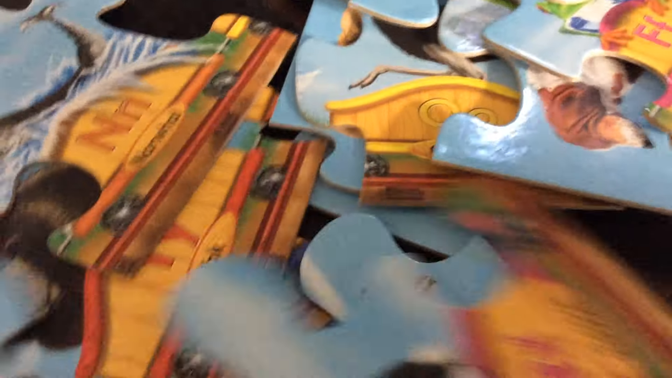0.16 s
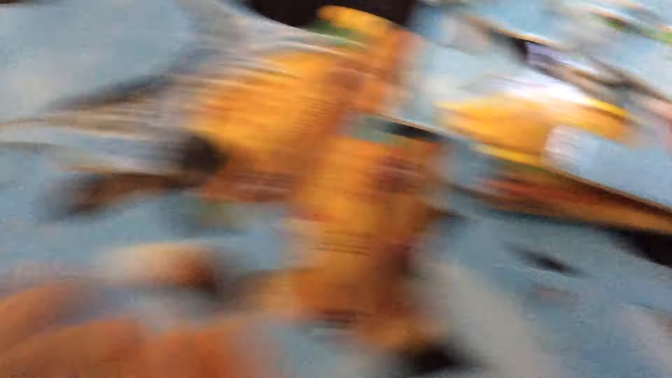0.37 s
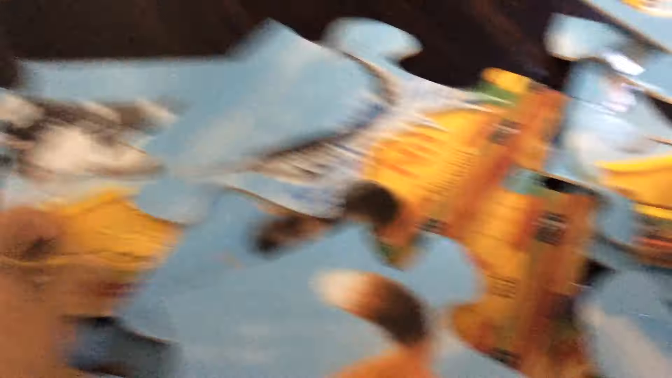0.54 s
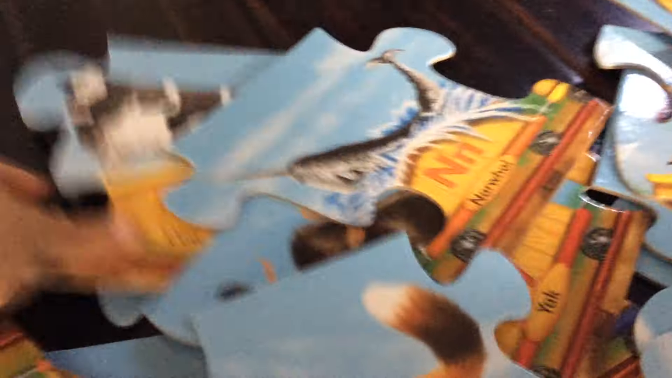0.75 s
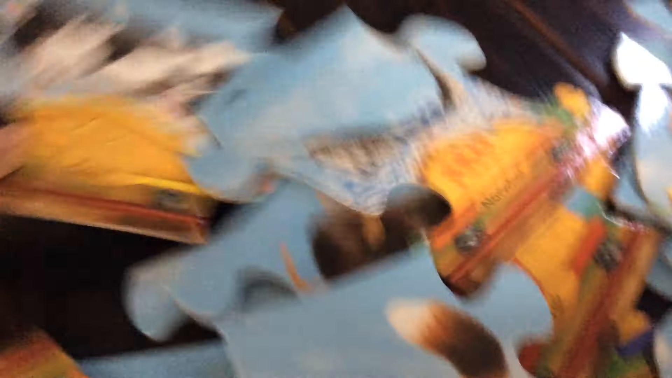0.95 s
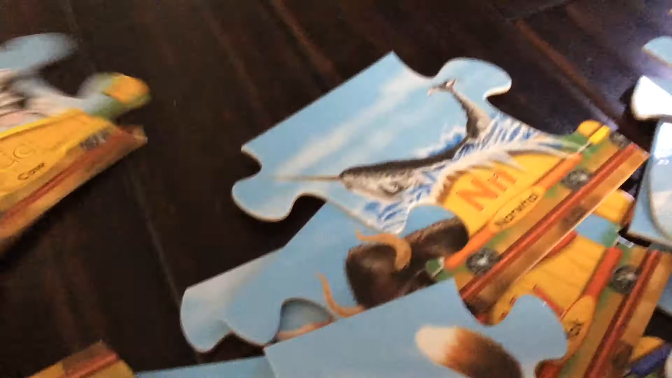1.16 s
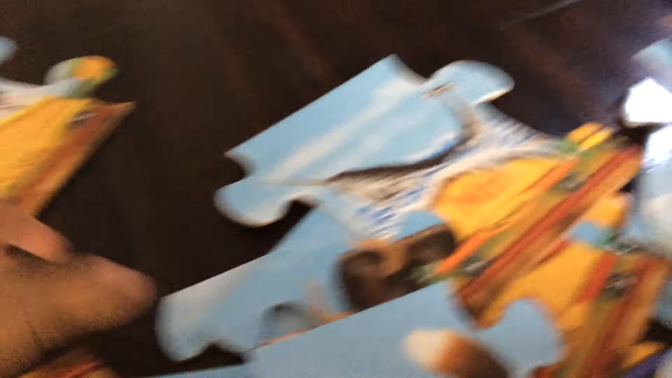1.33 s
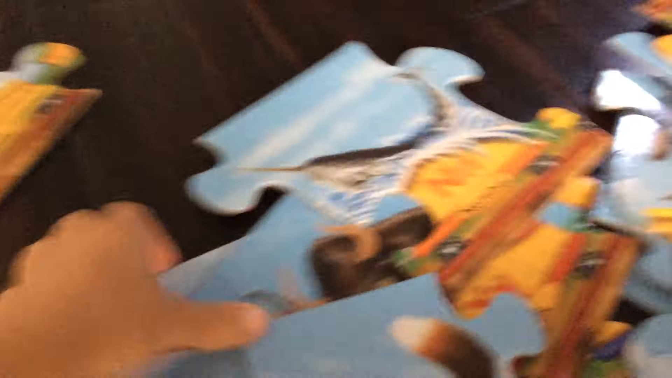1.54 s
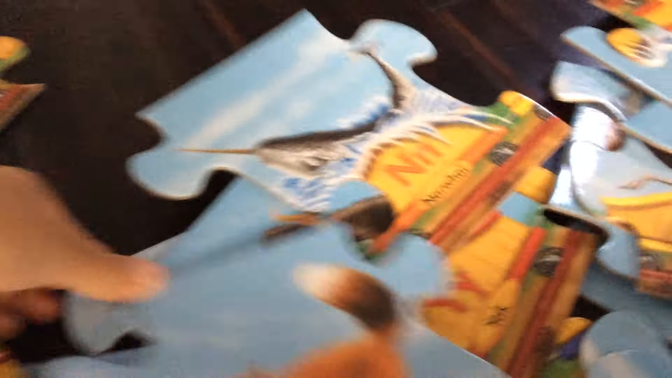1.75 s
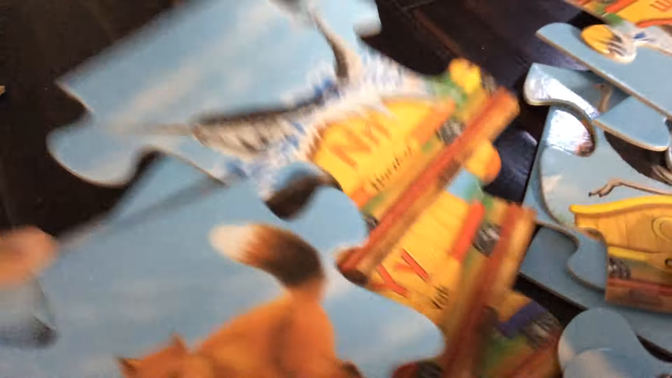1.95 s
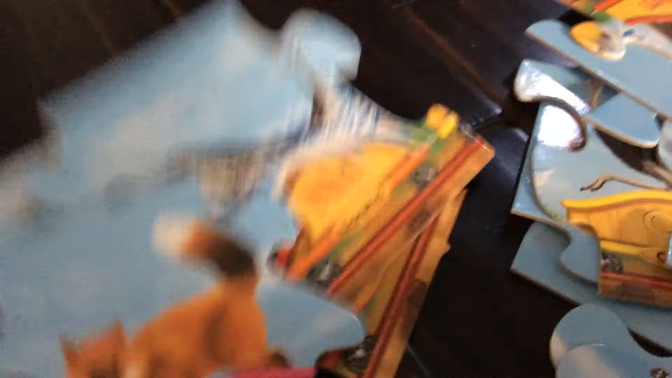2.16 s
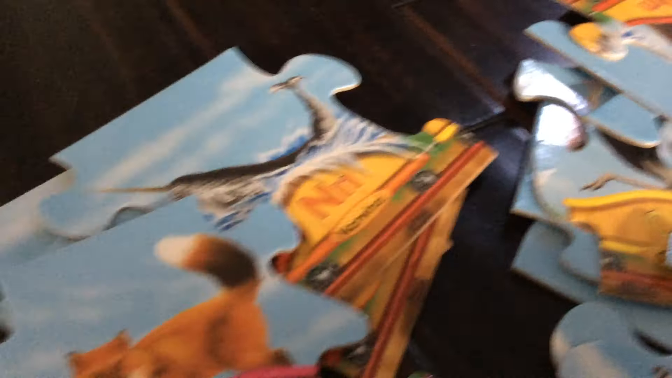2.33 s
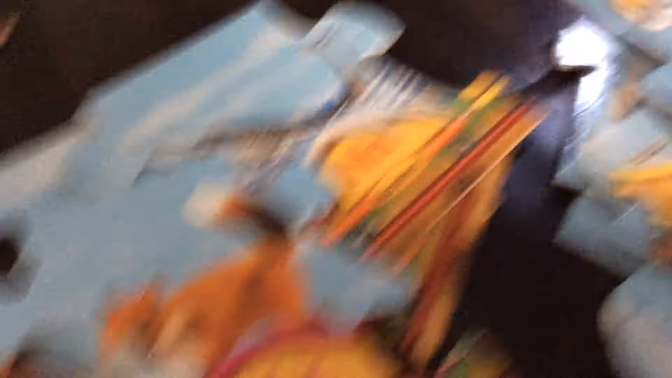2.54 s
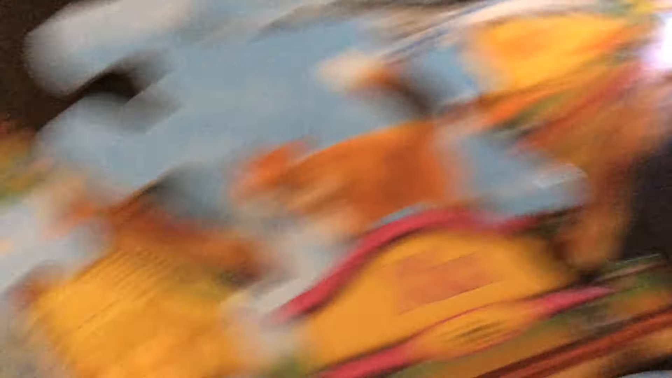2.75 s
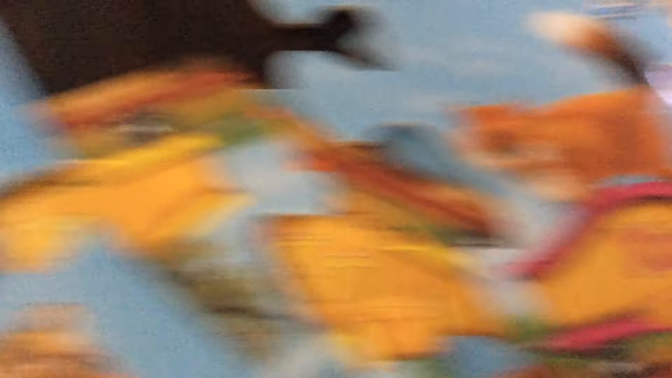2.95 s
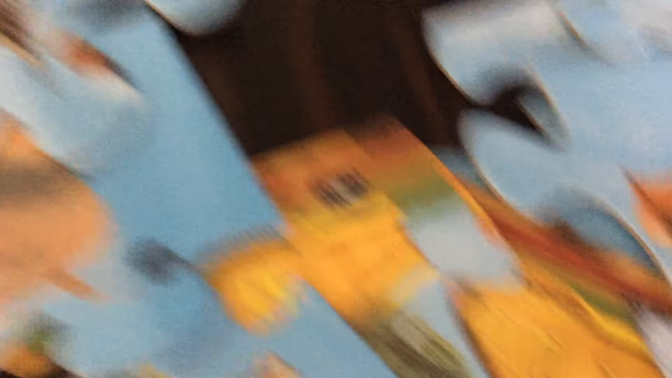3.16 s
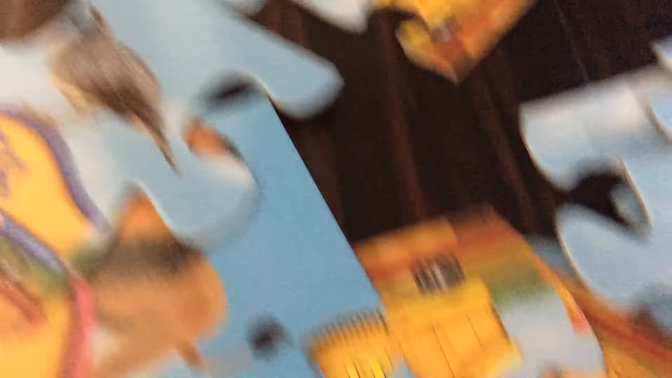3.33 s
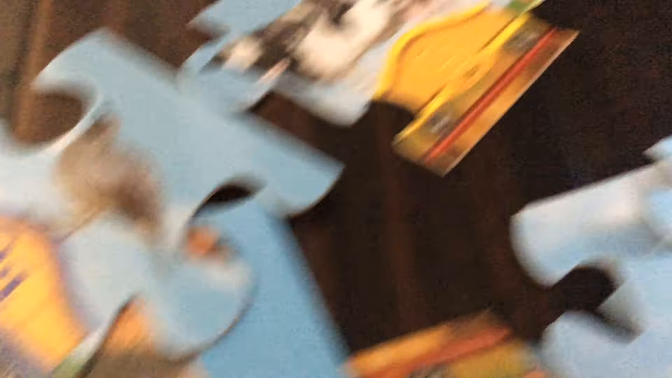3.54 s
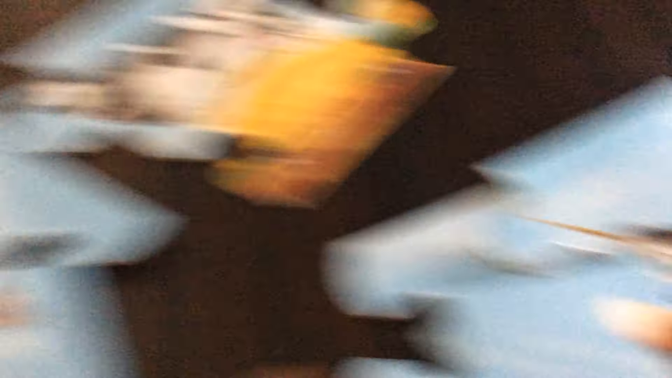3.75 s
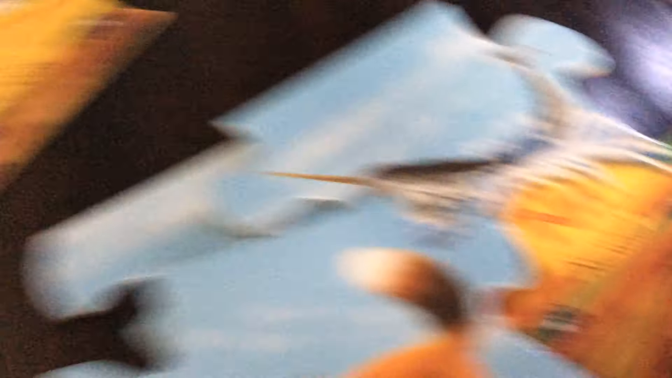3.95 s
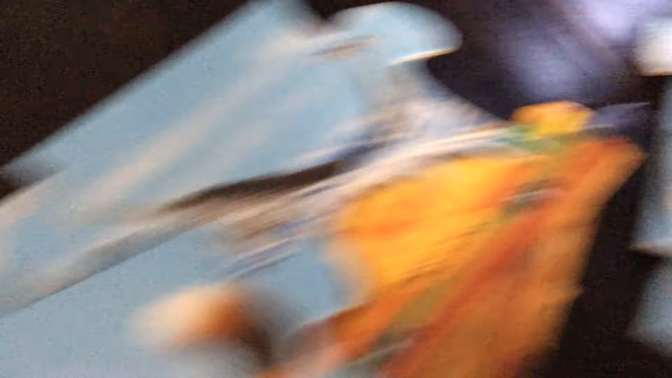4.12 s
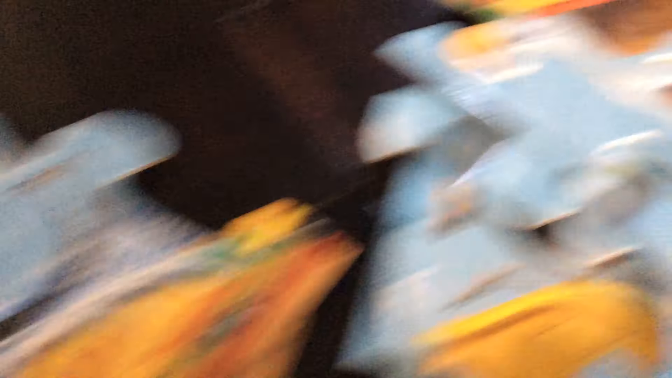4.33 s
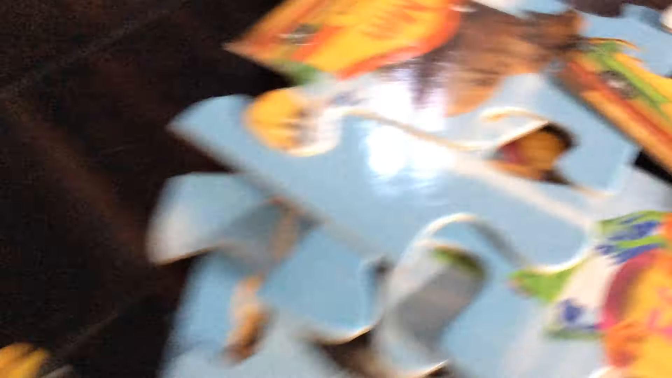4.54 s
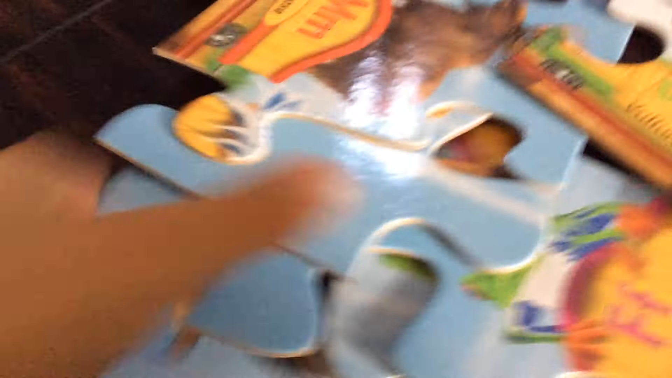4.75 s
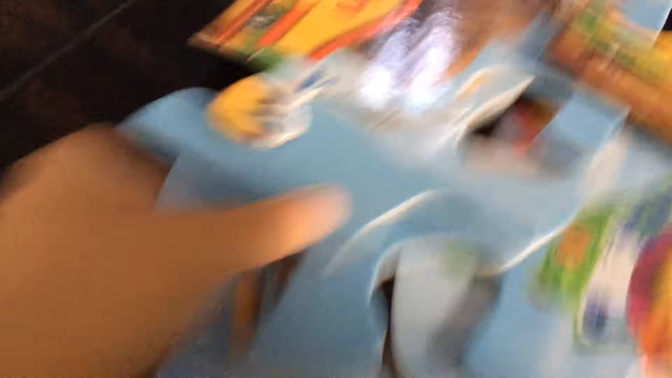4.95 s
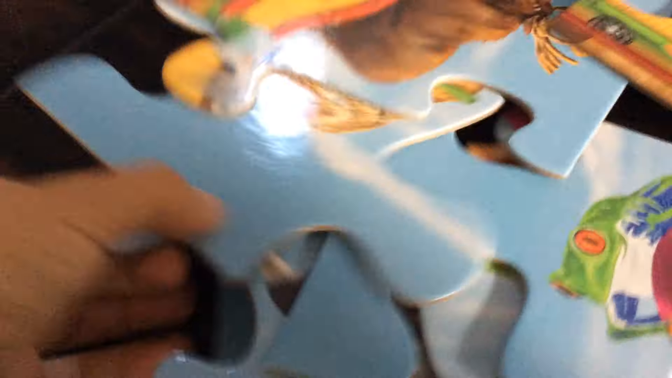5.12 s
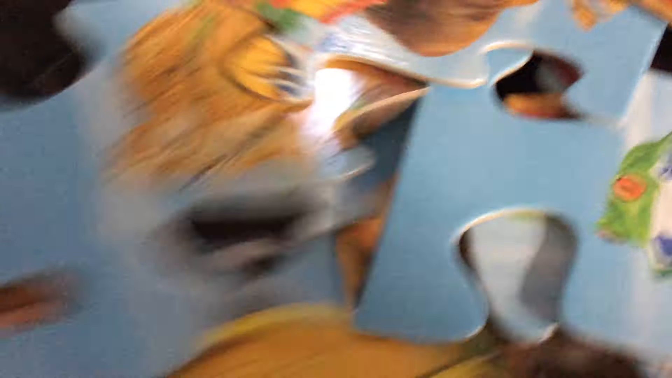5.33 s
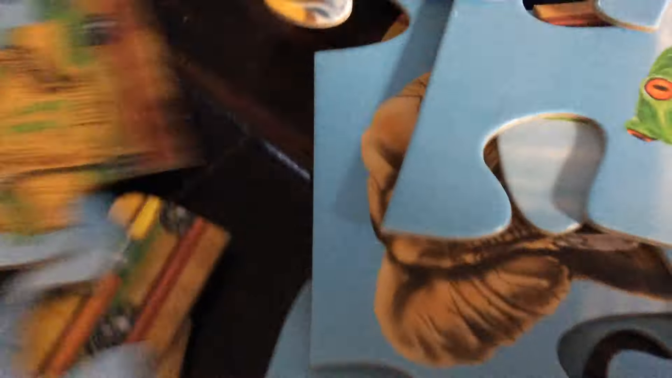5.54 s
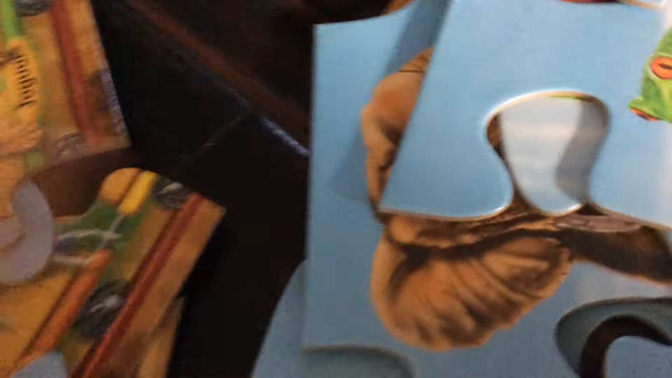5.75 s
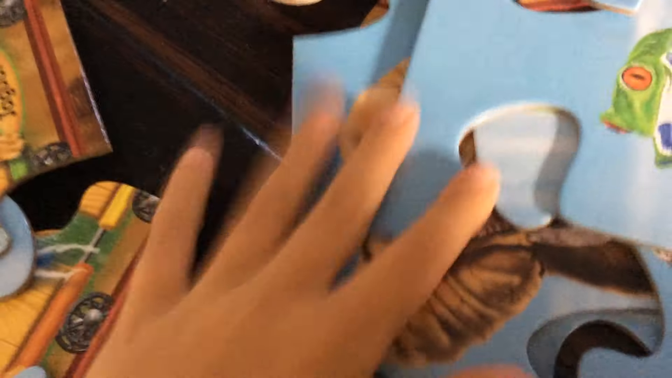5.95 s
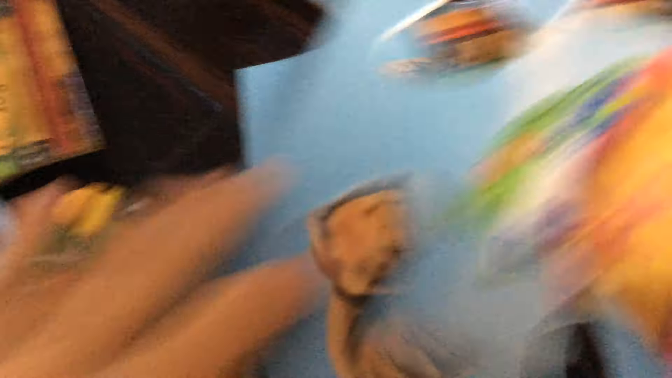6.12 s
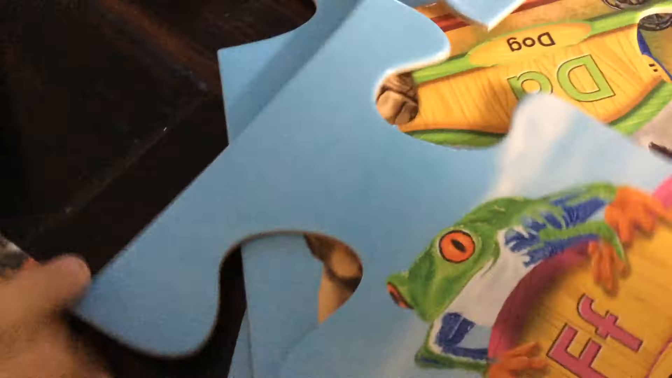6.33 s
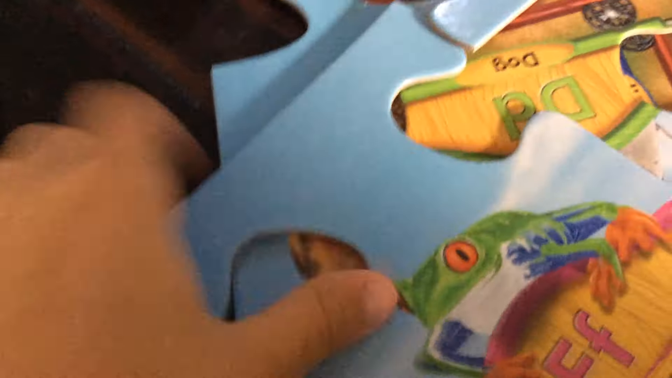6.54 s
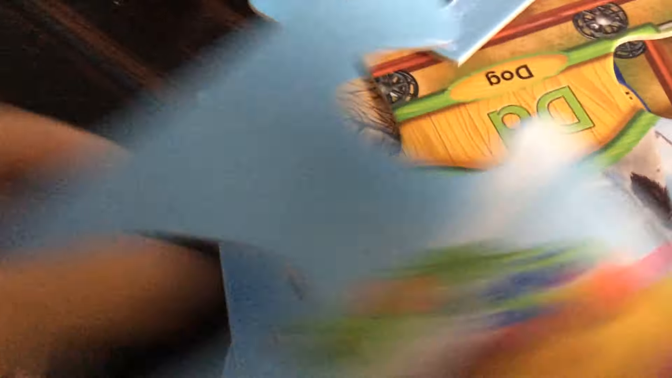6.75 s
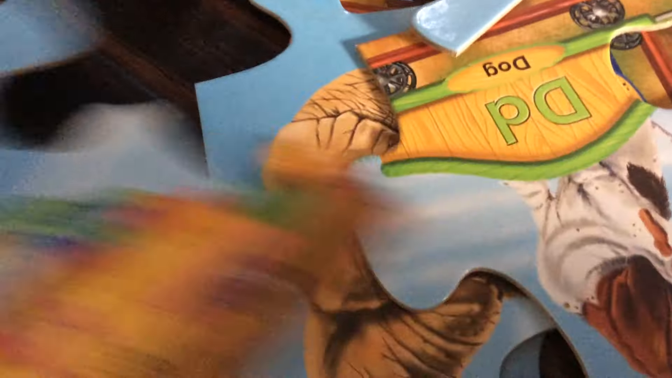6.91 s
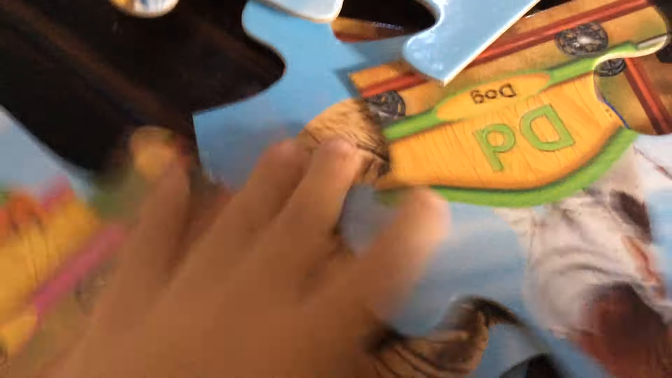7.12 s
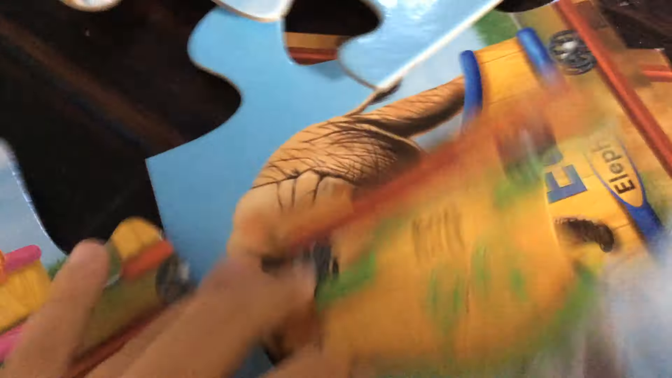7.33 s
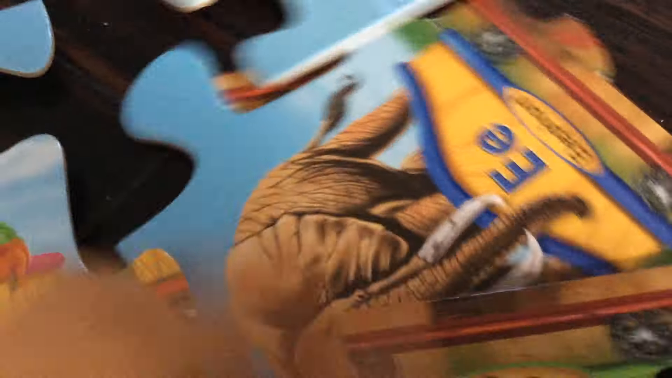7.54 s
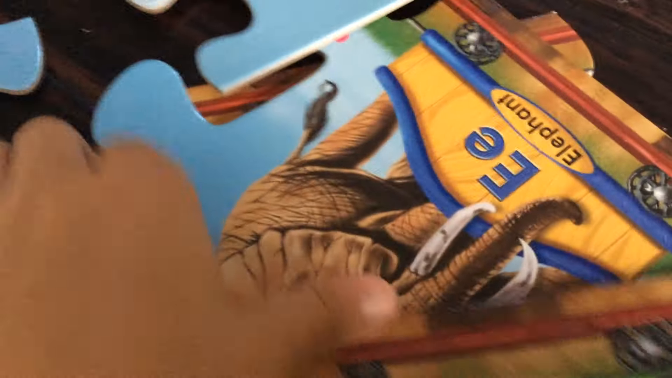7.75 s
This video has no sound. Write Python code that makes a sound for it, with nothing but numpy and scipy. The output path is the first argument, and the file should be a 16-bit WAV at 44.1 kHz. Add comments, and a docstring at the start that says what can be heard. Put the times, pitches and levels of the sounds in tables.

```python
"""Shuffling cardboard puzzle pieces

Thick pieces move on a hard floor in a quiet room, close to the microphone, while an appliance hums.
Edges tap and snap: noisy chatter rings card modes over a treble snap and a low floor thud.
Faces slide in grainy scrapes of shaped, clumpy noise; a lifted piece fans a puff of low noise at the port.
Taps and scrapes, but not the puff or the hum, leave a faint room echo."""
import sys
import numpy as np
from scipy import signal
from scipy.fft import rfft, irfft, next_fast_len
from scipy.io import wavfile
from scipy.ndimage import uniform_filter1d, map_coordinates

SR = 44100
rng = np.random.default_rng(int(sys.argv[2]) if len(sys.argv) > 2 else 0)


def dump_mix(stems):
    """Bounce the given channels to the path in sys.argv[1] as a 16-bit WAV at rate SR."""
    frames = np.atleast_2d(stems).T  # one column per channel
    limited = np.clip(frames, -1, 1)  # hard clip at full scale
    pcm = np.round(limited * 32767).astype(np.int16)
    wavfile.write(sys.argv[1], SR, pcm)


N = 347463  # samples, about 7.9 s


def amp(db):
    """Decibels to gain."""
    return 10 ** (np.asarray(db) / 20)


def unit(x):
    """Scale to rms 1."""
    return x / np.sqrt(np.mean(x ** 2) + 1e-20)


def along(points, hz):
    """Read a curve of (Hz, value) points on a log frequency axis."""
    f, v = np.transpose(points)
    return np.interp(np.log(hz + 1), np.log(f + 1), v)


def wobble(rate):
    """A smooth random curve with rate knots a second."""
    knots = rng.standard_normal(int(N * rate / SR) + 4)
    return map_coordinates(knots, [np.arange(N) * rate / SR])


def filtered(x, response):
    """Shape x by a response given as a function of frequency."""
    m = next_fast_len(N + SR // 2)
    return irfft(rfft(x, m) * response(np.fft.rfftfreq(m, 1 / SR)), m)[..., :N]


def coloured(x, spectrum):
    """Shape x by a spectrum, 60 dB further down outside its end points, and scale to rms 1."""
    lowest, highest = spectrum[0][0], spectrum[-1][0]

    def response(hz):
        outside = (hz > highest) | (hz < lowest)
        return amp(along(spectrum, hz) - 60 * outside)

    return unit(filtered(x, response))


def peak(rows):
    """Scale each row so that its loudest 1.5 ms has the power of a sine of amplitude 1."""
    power = uniform_filter1d(rows ** 2, 66, axis=1).max(axis=1, keepdims=True)
    return rows / np.sqrt(2 * power)


def swell(start, rise, hold, fade):
    """Gain that rises, holds and then loses 20 dB every fade seconds; signs of hold and fade are ignored."""
    t = np.arange(N) / SR - start
    fading = np.maximum(t - rise - abs(hold), 0)
    return np.clip(t / rise, 0, 1) ** 2 * amp(-20 * fading / abs(fade))


# Appliance tones: pitch_hz, level_db (rms, before a slow wobble)
HUM_TONES = [(123.8, -76), (193.8, -78.5), (296.1, -73.5), (629.8, -89)]
# Wavering level of the deepest hum: time_s, level_db (rms)
DEEP_HUM_LEVEL = [(0, -65.5), (1.2, -64), (1.5, -70.5), (2.8, -66.5), (3.5, -69.5), (5.5, -67), (6.5, -73),
                  (7.1, -73.5), (7.88, -66)]
# Spectrum of room noise and microphone hiss: freq_hz, level_db (per Hz, relative)
ROOM_NOISE_SPECTRUM = [(25, -30), (45, -12), (70, -10.5), (95, -10), (125, -7), (200, -10.5), (320, -12.5),
                       (677, -24), (1610, -20), (3520, -30), (9320, -29), (16000, -55.5)]
DEEP_HUM_HZ = 59.4
ROOM_NOISE_DB = -69.5


def background():
    """Steady room noise under appliance tones whose level and phase drift a little."""
    t = np.arange(N) / SR
    hum = np.zeros(N)
    for hz, db in HUM_TONES:
        level = np.sqrt(2) * amp(db + .8 * wobble(0.68))
        hum += level * np.sin(2 * np.pi * hz * t + hz / 400 * wobble(2.2))
    time_s, level_db = np.transpose(DEEP_HUM_LEVEL)
    deep_level = np.sqrt(2) * amp(np.interp(t, time_s, level_db))
    hum += deep_level * np.sin(2 * np.pi * DEEP_HUM_HZ * t + .3 * wobble(3))
    noise = coloured(rng.standard_normal(N), ROOM_NOISE_SPECTRUM)
    return hum + amp(ROOM_NOISE_DB + 0.27 * wobble(5.6)) * noise


# One piece drawn over another: start_s, hold_s (sign ignored; part goes into the rise),
# fade_s (per 20 dB, sign ignored), scrape_db, hiss_db (glossy face), drag_db (floor rumble)
SLIDE_STROKES = [(0.014, .035, .07, -54, -64, -58.5), (0.072, .02, 0.1, -56, -61.5, -62.5),
                 (0.1, .05, 0.16, -60, -59, -82), (0.154, .07, 0.24, -54.5, -59, -77.5),
                 (0.3, .03, 0.2, -64.5, -69, -67), (0.369, .03, 0.17, -63, -67, -72),
                 (0.405, .035, 0.05, -50, -65, -56), (0.476, .02, 0.12, -58, -85, -57),
                 (0.62, .02, 0.35, -58.5, -75, -64), (0.789, .02, 0.04, -61, -66, -63.5),
                 (0.871, .08, 0.3, -70, -80, -78), (0.959, .07, 0.36, -64, -71.5, -73),
                 (1.048, .01, -0.0457, -43, -52, -49.5), (1.1, .05, 0.32, -66, -62, -60),
                 (1.18, .01, -0.08, -50, -74, -55), (1.265, .01, 0.06, -55.5, -69, -57),
                 (1.496, .005, 0.3, -61, -73, -60.5), (1.58, .01, 0.29, -59, -69, -76),
                 (1.652, .1, 0.75, -65, -72, -71), (2.043, .08, 0.25, -58.5, -65, -62),
                 (2.15, .03, 0.02, -59, -64, -65), (2.21, .05, 0.12, -60, -69.5, -63.5),
                 (2.269, .03, 0.04, -44, -50, -42.5), (2.337, .01, 0.21, -57, -67, -64),
                 (3.471, .72, .2, -84, -79, -98), (3.766, .08, 0.57, -76.5, -94, -96),
                 (4.26, .04, 0.49, -84, -73.5, -88), (4.401, 0.38, 0.05, -77, -79.5, -78),
                 (4.76, .1, 0.24, -68, -66, -71.5), (4.94, .01, 0.21, -56.5, -63.5, -75),
                 (4.999, .35, 0.44, -68, -64.5, -78), (5.125, .03, 0.22, -53.5, -87.5, -65),
                 (5.375, .04, .03, -57.5, -71, -70.5), (5.431, .015, 0.0136, -46, -70, -56.5),
                 (5.476, .17, 0.06, -61, -64, -78), (5.699, .01, 0.25, -58, -66, -66),
                 (5.8, .2, 0.6, -69.5, -70.5, -77), (6.051, .13, .1, -67.5, -62.5, -69),
                 (6.195, .02, 0.2, -58, -61.5, -56), (6.268, .06, 0.3, -66, -63.5, -86),
                 (6.39, .09, -0.06, -73, -67, -79), (6.48, .11, 0.3, -70, -69, -75),
                 (6.637, .09, 0.03, -61, -62.5, -61), (6.771, .06, -0.2, -67, -69, -65),
                 (6.848, .02, -0.37, -61, -60.5, -62.5), (6.918, 0.043, -0.8, -70, -66, -70),
                 (6.977, .01, 0.16, -58, -65, -60), (7.025, .06, -0.28, -65, -79, -82),
                 (7.218, .03, 0.17, -60, -69, -64.5), (7.27, .12, 0.15, -64, -66.5, -83),
                 (7.379, .22, 0.13, -63.5, -64.5, -73), (7.739, .05, 0.14, -60, -71, -62.5),
                 (7.814, .03, -0.36, -60, -67.5, -61)]
GRIP_S, RISE_SHARE_OF_HOLD = 0.018, .2  # a stroke rises for the grip time plus this share of its hold


def strokes():
    """Gains of scrape, hiss and drag; overlapping strokes add as powers."""
    power = 0
    for start, hold, fade, *levels_db in SLIDE_STROKES:
        rise = GRIP_S + RISE_SHARE_OF_HOLD * abs(hold)
        shape = swell(start, rise, (1 - RISE_SHARE_OF_HOLD) * hold, fade)
        power = power + (amp(levels_db)[:, None] * shape) ** 2
    return np.sqrt(power)


def streaky(x, depth_db):
    """Narrow bands swell and fade on their own, as the free, ringing part of a sliding card changes."""
    bands = signal.stft(x, nperseg=256)[2]
    field = uniform_filter1d(rng.standard_normal(bands.shape), size=2, axis=0)
    field = uniform_filter1d(field, size=14, axis=1)
    return signal.istft(bands * amp(depth_db * unit(field)), nperseg=256)[1][:N]


# Spectrum of the card's scrape: freq_hz, level_db (per Hz, relative)
SCRAPE_SPECTRUM = [(290, -46.5), (500, 2.5), (543, -18.5), (750, 1), (1020, -1.5), (1390, 5), (2120, 3),
                   (2840, -4.5), (3080, -7.5), (3880, -4), (4390, -10), (6000, -18.5), (7800, -41),
                   (13200, -120)]
# Spectrum of the glossy face's hiss: freq_hz, level_db (per Hz, relative)
GLOSS_SPECTRUM = [(2060, -13.5), (3500, -5.5), (4240, -10.5), (5220, -6), (12200, -12), (14700, -19.5),
                  (16000, -29.5)]
# Spectrum of the floor's drag rumble: freq_hz, level_db (per Hz, relative)
DRAG_SPECTRUM = [(90, -24.5), (150, -4), (250, -7), (400, -5.5), (700, -10.5)]


def sliding():
    """Fibres catch and let go in clumps; the same catches excite card, glossy face and floor."""
    scrape, hiss, drag = strokes()
    clumps = wobble(45)
    catches = unit((rng.random(N) < .03) * rng.standard_normal(N))

    def rub(grain, depth_db):
        rubbing = rng.standard_normal(N) + grain * catches
        return rubbing * amp(depth_db * clumps + 1.5 * wobble(120))

    card = scrape * coloured(streaky(rub(.7, 1.3), depth_db=3.2), SCRAPE_SPECTRUM)
    face = hiss * coloured(streaky(rub(.35, 1.2), depth_db=1.5), GLOSS_SPECTRUM)
    floor = drag * coloured(rub(.9, 3), DRAG_SPECTRUM)
    return card + face + floor


TICK_OVER_SCRAPE_DB, TICK_HZ, TICK_T60_MS = 6.5, 1900, 14  # typical level and pitch; chatter decay
TICK_SNAP_DB, TICK_THUD_DB = -15.5, -12  # typical values for the tap columns snap_db and thud_db


def ticks(count):
    """Tap rows for small edges that catch by chance, more often and louder in a strong stroke."""
    scrape = strokes()[0] + 1e-9
    busy = np.cumsum(np.sqrt(scrape))
    at = np.searchsorted(busy, rng.random(count) * busy[-1])
    luck = rng.standard_normal((count, 4))
    level_db = 20 * np.log10(scrape[at]) + TICK_OVER_SCRAPE_DB + 3 * luck[:, 0]
    pitch_hz = TICK_HZ * np.exp(0.098 * luck[:, 1])
    snap_db = TICK_SNAP_DB + 7 * luck[:, 2]
    thud_db = TICK_THUD_DB + 6 * luck[:, 3]
    return np.transpose([at / SR, level_db, pitch_hz, snap_db, thud_db, np.full(count, TICK_T60_MS)])


# Edge contacts: blow_s, level_db (peak of the card's ring), pitch_hz (before the mode ratios),
# snap_db (over the card), thud_db (over the card, before a 6 dB cut), chatter_t60_ms (before limits and scaling)
EDGE_TAPS = [(0.0357, -32, 1850, -14.5, -16, 20.5), (0.0447, -28, 3512, -4, -26, 15.5),
             (0.0714, -48, 1860, -8, -17, 32), (0.0985, -42, 1790, -7, -14, 23.4),
             (0.2133, -46.5, 2540, -1.5, -2, 25), (0.2563, -45, 2770, -20.5, -3, 34),
             (0.4204, -46.5, 1580, 6.5, -5.5, 15), (0.425, -36, 2857, -11.5, -24, 34.7),
             (0.4308, -33.5, 2336, -17, -24, 12.8), (0.4396, -34, 1950, -17.5, -18.5, 10.3),
             (0.45, -39.5, 1590, -15.5, -6, 11), (0.4663, -39.5, 1840, -20, -19, 17),
             (0.4902, -49, 1750, -9, -16, 30), (0.4956, -45.5, 1195, -18, -18, 14),
             (0.5148, -28.5, 1199, -42, -24, 20.3), (0.5392, -42, 1195, -30, -24.5, 6.5),
             (0.5495, -52, 1130, -27, -16, 22), (0.5805, -57, 1720, -22.5, -22, 13),
             (0.5976, -50, 1340, -22.5, 3, 29.5), (0.6082, -50, 1940, -7.5, -2, 50),
             (0.6306, -41, 1800, -15, 4.5, 25), (0.6346, -36, 1690, -27, -2, 80),
             (0.6467, -35.5, 1760, -17, 0, 22), (0.6754, -32.5, 1360, -41, -19, 18.5),
             (0.6846, -36, 1070, -34, -24, 21), (0.695, -46, 1500, -24, -22, 15),
             (0.7083, -49, 1800, -23, -10, 25), (0.756, -50.5, 1570, -9, -16, 12),
             (0.7993, -51.5, 1790, 0, 3, 30), (0.811, -38, 1440, -18.5, -26.5, 8),
             (0.8422, -44, 1254, -7, -8.5, 25), (0.8814, -53.5, 1240, -6, 3, 20),
             (0.9712, -36, 1280, -40, -20, 15.5), (1.0461, -36, 1190, -15.5, -23, 16),
             (1.0556, -39, 2020, -4.5, -1, 29), (1.0633, -37.5, 1750, -12, -11, 28.6),
             (1.0721, -32, 1977, -14, -32, 18), (1.0814, -37, 1190, -3.5, -24, 75),
             (1.09, -38.5, 1840, -2, -23, 82), (1.1216, -41, 1670, -7, -7, 21),
             (1.1708, -41.5, 1520, -15, -9.5, 18), (1.1773, -36.5, 1680, -21.5, -16, 15),
             (1.1888, -38, 3290, -8.5, -7.5, 14), (1.2011, -41.5, 3360, -13, 0, 20),
             (1.2116, -43.5, 1500, -5, 2, 11), (1.222, -47, 1750, 6.5, -3, 64.3),
             (1.2719, -43, 1830, -3.5, -12, 21), (1.2863, -39, 1730, -8, -12, 26.7),
             (1.2901, -34.5, 1710, -17.5, -12, 35.9), (1.5101, -47, 1120, -9.5, 12.5, 21),
             (1.581, -35, 1490, -28, -31, 13.6), (1.5878, -33, 1610, -16, -15.5, 31),
             (1.6048, -43.5, 1800, -5, -1, 23), (1.6199, -43, 3300, -12, -21, 13),
             (1.6869, -44.5, 1540, -9, -3.5, 17), (1.8081, -47.5, 1150, -21, 0.5, 23.4),
             (1.8226, -45, 1153, -2, -27, 31), (1.8622, -46, 1190, -20.5, -26, 26),
             (1.9458, -51.5, 1080, -19, 1.5, 42), (1.994, -53, 1440, -8, -1, 16),
             (2.0143, -47.5, 1160, -9, -8.5, 17), (2.0567, -46.5, 3950, -18, -4, 17),
             (2.0811, -45.5, 1010, -22, -.6, 18), (2.0901, -51, 1180, -27, -10, 41),
             (2.1215, -49.5, 1090, -9, -15, 50), (2.1729, -40.5, 1080, -8, -7, 37),
             (2.2234, -39, 1120, -12, -20, 19), (2.2579, -40, 1430, -20, -17, 11),
             (2.2617, -36.5, 1320, -28, -23.5, 37.6), (2.2719, -33.5, 1520, -8, -22, 19.4),
             (2.2863, -24, 2300, -14.5, 0, 25), (2.2904, -16.5, 2090, -0.5, -6, 16.2),
             (2.2974, -35.5, 910, -10, -2, 58), (2.3176, -32.5, 2030, -13, -19.5, 23),
             (2.336, -37.5, 1450, -5, 0, 53), (2.3482, -34, 1180, -3, -2, 26.5),
             (2.3579, -43, 1500, -14, 3.5, 6.8), (2.3962, -48.5, 3020, -8, -11, 9),
             (2.4808, -57.5, 1796, -24.5, -11.5, 23.6), (3.4839, -64, 2118, 7.5, -2.5, 19),
             (3.5517, -56, 1350, -12, -19.5, 40), (3.9384, -70, 1590, 8.5, -9, 20),
             (4.7548, -48.5, 3717, 5, -6, 32.4), (4.7946, -53.5, 1070, -1, 0, 17),
             (4.8053, -52.5, 1422, -2, 8.5, 17), (4.9515, -40.5, 1640, -14, -5, 18),
             (4.9584, -50.5, 1510, -10, 8, 5.5), (5.0413, -47, 1840, -10, -11, 32),
             (5.0795, -39.5, 1790, -8.5, -27, 71), (5.1238, -32, 1883, -10, -15, 24.4),
             (5.148, -27, 1830, -8.5, -13, 17), (5.1602, -23, 1970, -13, -6.5, 19.6),
             (5.1988, -31.5, 1880, -11, -47, 26.4), (5.2055, -32.5, 2030, -21, -29, 14.7),
             (5.2323, -47, 1780, -20, -27.5, 56), (5.2406, -43, 1820, 9, -17, 27.6),
             (5.339, -52, 1500, -3, -8, 10), (5.397, -44.5, 2350, -5, -9, 26.4),
             (5.4182, -43, 1517, -3.5, -24, 23), (5.4395, -43, 1440, -24, -10, 20),
             (5.4446, -27, 1460, -14.5, -29, 4.8), (5.4562, -26, 1620, -8, -13.5, 7.9),
             (5.4708, -35, 1700, -19, -4, 18), (5.4743, -43, 2160, -8, -17.5, 17.5),
             (5.512, -42, 1600, -14, -8, 14), (5.5219, -37.5, 1380, -5.5, -26.5, 22),
             (5.5311, -32, 1760, -25, -11.5, 11), (5.6256, -53, 1870, -12, -6, 6.6),
             (5.6623, -56, 1790, 8.5, -11, 45), (5.6991, -24.5, 2770, -7.5, -9, 19.6),
             (5.7095, -30.5, 1590, -6.5, 3.5, 22), (5.736, -43.5, 2600, -23, -23, 42),
             (5.7518, -45, 2800, -26, -2, 24), (5.8875, -55, 3000, -4, -1, 62),
             (5.9916, -53, 2660, -24, -4, 8.8), (6.0391, -55, 2580, -16.5, 4, 9.6),
             (6.1865, -48, 1610, -3.5, 1, 74), (6.2113, -41, 1900, -5, -21, 51.7),
             (6.2287, -46.5, 2480, 6, -3, 13.4), (6.238, -46.5, 1800, -11, 10.5, 31),
             (6.2458, -47, 1790, -4.5, -4, 17), (6.2868, -46.5, 1670, -2.5, -17.5, 46.7),
             (6.3138, -37.5, 3993, 2, -22, 26), (6.3257, -43, 2050, -6, 6, 12),
             (6.4617, -51, 1810, -14, -17, 5.9), (6.7315, -55, 3940, 4, -2, 13),
             (6.7421, -28.5, 3550, -20, -17, 10.3), (6.7533, -37.5, 2240, -30, -18, 11),
             (6.8018, -49.5, 1620, -20, -1, 27), (6.8818, -34.5, 1743, -39, -26, 5.7),
             (6.8911, -49, 1740, 5.5, -13, 100), (6.9853, -24.5, 1525, -1, -8, 48),
             (7.0267, -43, 2540, -3.5, -2, 17), (7.0693, -59.5, 1460, 15, 7, 35),
             (7.102, -47.5, 1530, -10, -21, 39), (7.1491, -54.5, 1420, -32, -8, 14),
             (7.2018, -51, 3500, 1.5, -6, 19.3), (7.2115, -45.5, 1967, -0.5, -5, 36),
             (7.2353, -43.5, 1675, -7.5, -18, 21), (7.2437, -44, 1550, -17, -2, 12.3),
             (7.2843, -44, 1550, -6, -12, 14), (7.4597, -44, 2180, 0.5, -30, 8.6),
             (7.6288, -51, 2220, 2, 11, 18), (7.72, -51, 2110, -17, -6, 11),
             (7.7457, -36, 1350, -14, -24, 27), (7.7507, -36.5, 1392, -11, -5.5, 8.6),
             (7.7721, -39, 2040, -18, -7, 16), (7.7957, -51.5, 1900, -2.5, -14, 17),
             (7.8024, -40.5, 2010, -8, -12, 25), (7.8488, -38, 1316, -3.5, 3.5, 5.1)]
# Ringing modes of a piece: pitch_ratio, level_db (before chance), t60_ms (for a blow at -43 dB)
CARD_MODES = [(1.015, 5, 9.4), (1.346, -7.5, 8), (1.7, -6.5, 3.6), (2.1, -19, 13), (0.21, -7.5, 0.83)]
# Treble of the snap: freq_hz, level_db (per Hz, relative)
SNAP_SPECTRUM = [(500, -24), (1300, -7), (2500, 0.5), (4500, 5), (6500, 2), (9000, 1.5), (12000, -11.5),
                 (16000, -12.5)]
# Modes of floor and trapped air: freq_hz, level_db (before chance), t60_ms
THUD_MODES = [(94.74, -15.5, 160), (205.2, -6.5, 13), (250, 13, 26), (341, 5.5, 27), (410, -10.5, 22)]
RISE_MS, RISE_SHARE = 1.105, .04  # an edge takes this long to land, plus this share of its chatter
RADIATES_HZ = 950  # a small card moves little air below this


def taps():
    """Each contact chatters for a moment, rings the card, snaps in the treble and thuds on the floor."""
    rows = np.vstack([EDGE_TAPS, ticks(count=45)])
    blow_s, level_db, pitch_hz, snap_db, thud_db, t60 = rows.T[:, :, None]
    count = len(rows)
    ms = np.arange(3072) / SR * 1000
    t60 = np.clip(t60, 4, 70)
    rise = RISE_MS + RISE_SHARE * t60

    # an edge lands unevenly: spiky chatter swells to the blow and fades, hardest at the blow itself
    blow_db = 5.4 * np.exp(-((ms - rise) / 0.17) ** 2)
    spikes = amp(3.26 * rng.standard_normal((count, len(ms))) + blow_db)

    def chatter(fade_ms):
        press = np.clip(ms / rise, 0, 1) ** 2 * amp(-60 * np.maximum(ms - rise, 0) / fade_ms)
        return rng.standard_normal((count, len(ms))) * spikes * press

    damping = amp(0.13 * (level_db + 43))  # a harder blow presses the card flat and chokes its ring
    ring = 0
    for ratio, mode_db, decay_ms in CARD_MODES:
        luck_db = 2.3 * rng.standard_normal((count, 1))
        envelope = amp(mode_db + luck_db - 60 * damping * ms / decay_ms)
        ring = ring + envelope * np.sin(2 * np.pi * ratio * pitch_hz * ms / 1000)
    radiation = signal.butter(2, RADIATES_HZ, "highpass", fs=SR, output="sos")
    ring = signal.sosfilt(radiation, ring)
    card = peak(signal.fftconvolve(chatter(1.18 * t60), ring, axes=1)[:, :len(ms)])

    treble = amp(along(SNAP_SPECTRUM, np.fft.rfftfreq(len(ms), 1 / SR)))
    snap = peak(irfft(rfft(chatter(0.75 * t60)) * treble))

    thud = 0
    for hz, mode_db, decay_ms in THUD_MODES:
        luck_db = 9.7 * rng.standard_normal((count, 1))
        thud = thud + amp(mode_db + luck_db - 60 * ms / decay_ms) * np.sin(2 * np.pi * hz * ms / 1000)
    polarity = np.sign(rng.standard_normal((count, 1)))
    thud = peak(thud * polarity * (1 - np.exp(-ms / (rise + 3.7))))

    sounds = amp(level_db) * (card + amp(snap_db) * snap + amp(thud_db - 6) * thud)
    # start early by the rise, so that the blow falls on its time
    at = np.round(np.abs(blow_s - rise / 1000) * SR).astype(int) + np.arange(len(ms))
    return np.bincount(at.ravel(), sounds.ravel(), N + len(ms))[:N]


# Decay of the room: freq_hz, t60_s
ROOM_DECAY = [(150, 0.23), (1500, 0.1), (10000, 0.11)]


def room(x):
    """Noise echo, 200 samples late, in which each frequency dies at its own speed."""
    hz, t, bands = signal.stft(rng.standard_normal(SR // 2), SR, nperseg=256)
    decay = amp(-60 * t / along(ROOM_DECAY, hz)[:, None])
    tail = signal.istft(bands * decay, SR, nperseg=256)[1]
    return signal.fftconvolve(np.pad(x, (200, 0)), tail / np.linalg.norm(tail))[:N]


# Spectrum of air on the microphone port: freq_hz, level_db (per Hz, relative)
PUFF_SPECTRUM = [(25, -31), (45, -8), (75, 4.5), (110, -10), (200, -4.5), (350, -14.5), (500, -21),
                 (800, -37)]


def puff():
    """A lifted piece fans lumpy air over the microphone port."""
    lumpy = rng.standard_normal(N) * amp(2.1 * wobble(55))
    gust = swell(start=6.572, rise=0.0044, hold=0.057, fade=0.118)  # seconds
    return amp(-43) * gust * coloured(lumpy, PUFF_SPECTRUM)


def scene():
    """Pieces, their echo, the puff and the room."""
    pieces = taps() + sliding()
    echo = amp(-19.5) * room(pieces)
    return (pieces + echo + puff() + background())[None]


def record(dry):
    """The microphone drops the deepest bass and keeps nothing from its band limit up."""
    corner_hz, top_hz = 45, 15900

    def response(hz):
        bass = (1j * hz / (1j * hz + corner_hz)) ** 2
        return bass * (hz < top_hz)

    return filtered(dry, response)


dry = scene()
out = record(dry)
dump_mix(out)
```